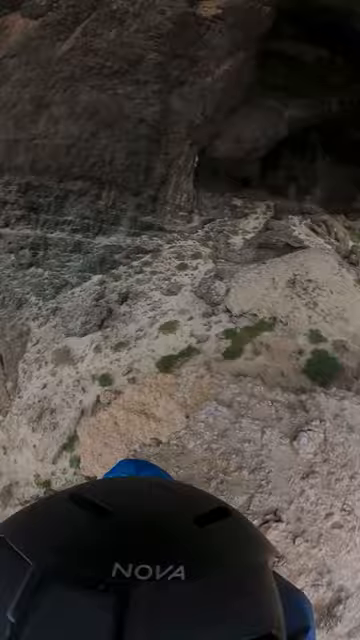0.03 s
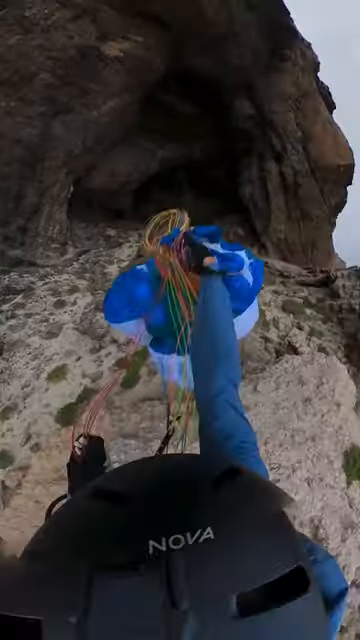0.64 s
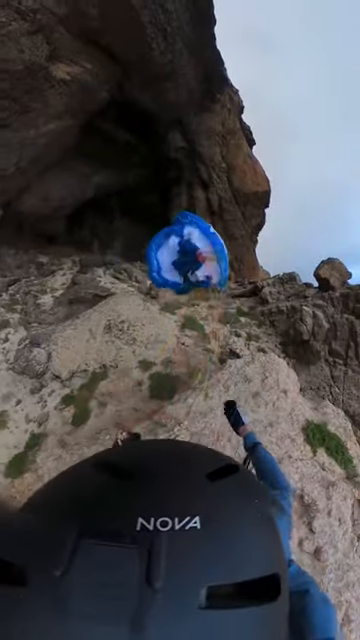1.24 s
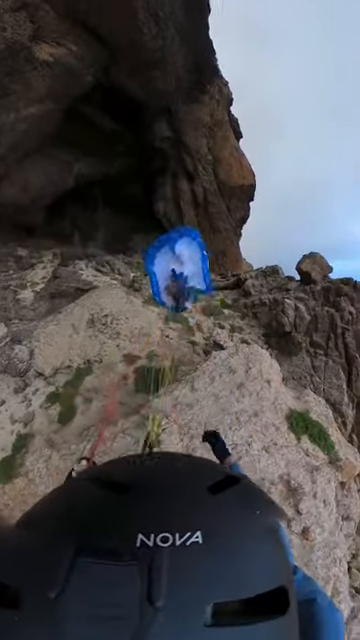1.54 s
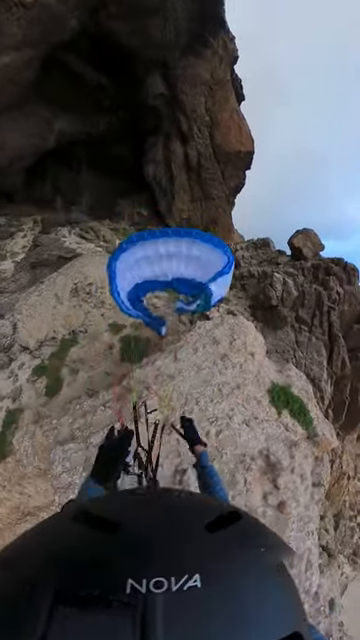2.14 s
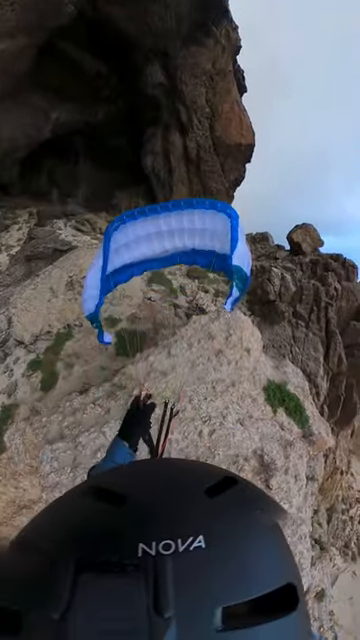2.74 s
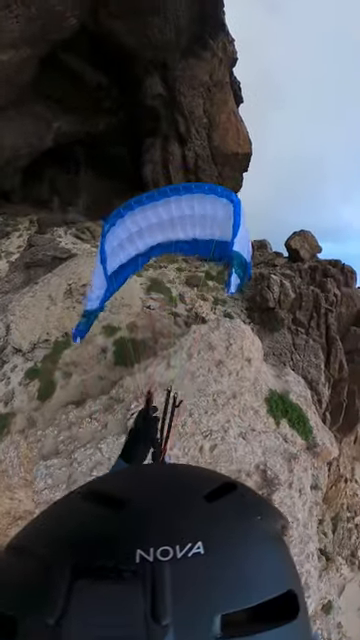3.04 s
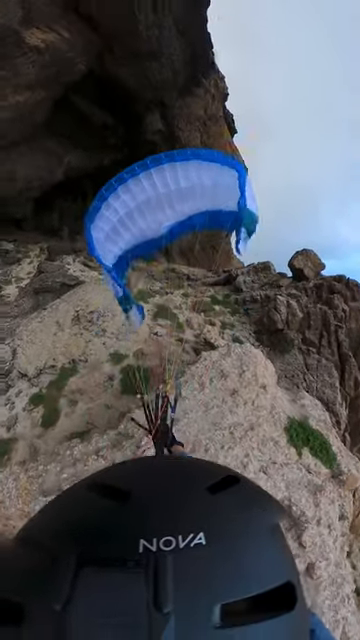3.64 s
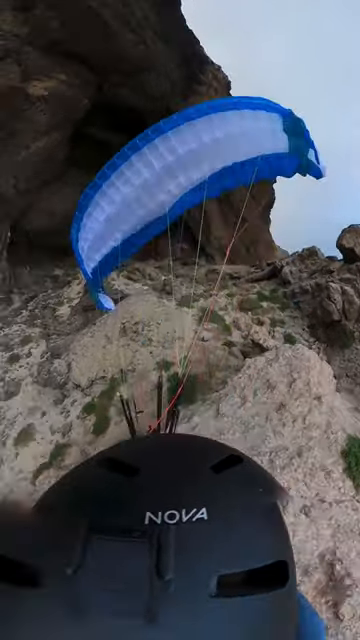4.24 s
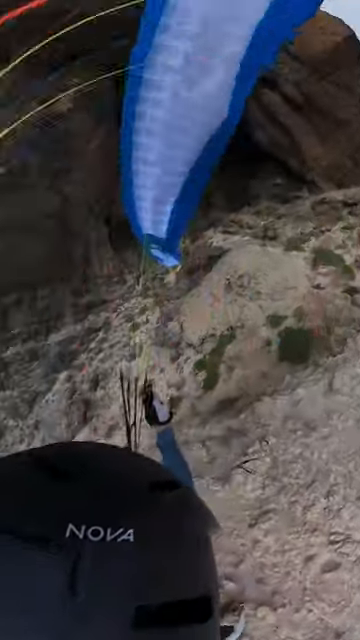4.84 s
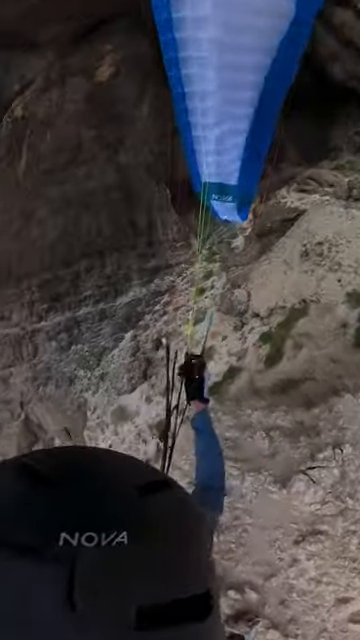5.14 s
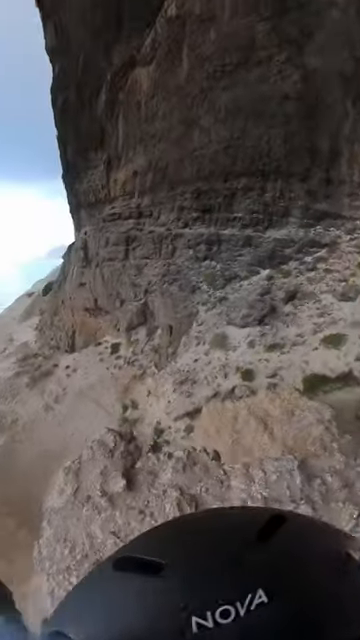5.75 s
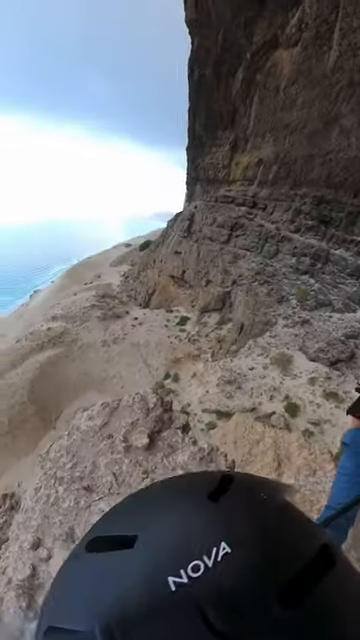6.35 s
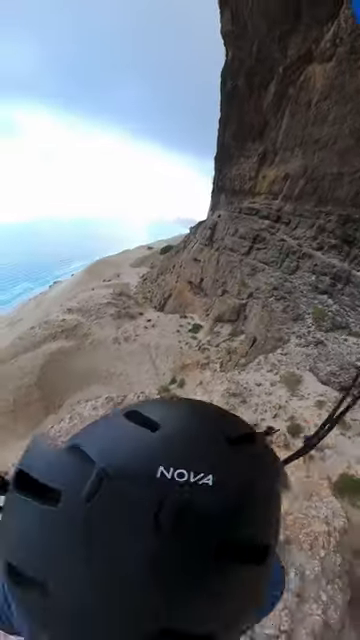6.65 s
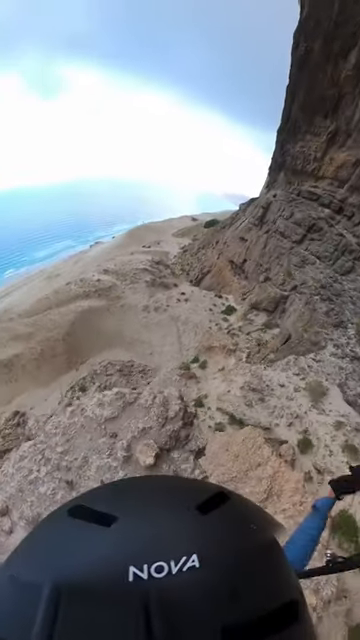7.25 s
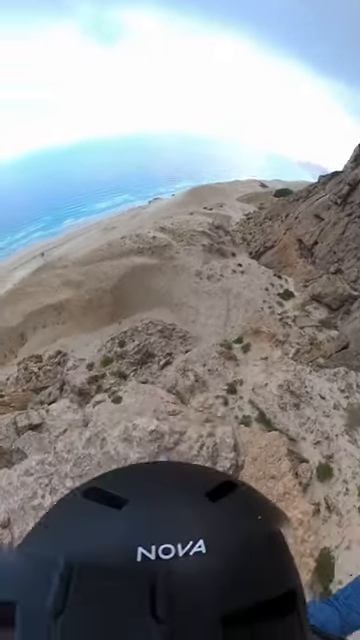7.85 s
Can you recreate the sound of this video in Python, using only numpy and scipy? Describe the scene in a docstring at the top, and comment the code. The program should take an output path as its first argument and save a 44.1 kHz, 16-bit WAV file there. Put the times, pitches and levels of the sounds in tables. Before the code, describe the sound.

Wind rushes and thumps on the microphone, swelling to a hiss, with rustling paraglider fabric and small dull knocks from the lines.

```python
"""Beside a cliff, a paraglider pilot throws the wing open and swings away under it.
We ride just above the helmet: the air roars and hisses with speed, and eddies buffet the microphone,
throbbing and hooting across its port. Sleeves brush the harness, the throw whooshes past, and lines
zip over cloth and snap taut with small dull knocks. Nylon swishes and crackles as it pays out and fills."""
import sys
import numpy as np
from scipy import signal
from scipy.fft import rfft, irfft
from scipy.io import wavfile
from scipy.ndimage import uniform_filter1d

SR = 44100
rng = np.random.default_rng(int(sys.argv[2]) if len(sys.argv) > 2 else 0)


def transcribe(signal):
    """Save signal, clipped to [-1, 1], as a 16-bit WAV file at the path in sys.argv[1]."""
    frames = np.atleast_2d(signal).T
    limited = np.clip(frames, -1, 1)
    pcm = np.round(limited * 32767).astype(np.int16)
    wavfile.write(sys.argv[1], SR, pcm)


N = 357210
TIME = np.arange(N) / SR

# The tone colours of the noise layers. Each row: frequency in Hz, relative level in dB.
ROAR_SPECTRUM = [(100, -20.5), (220, 3), (380, 1), (650, -2), (1000, -7.5), (1600, -13), (2500, -21),
                 (4500, -29.5), (9000, -68), (14000, -89)]
HISS_SPECTRUM = [(400, -25.5), (1200, 2.5), (2600, 4), (4000, 0.5), (5600, -1.5), (6500, -5), (8000, -9.5),
                 (9700, -17), (10500, -22.5), (12500, -29), (15500, -55)]
FIZZ_SPECTRUM = [(6000, -29), (9500, 4), (10500, -15), (11500, -1), (12300, 3), (13500, -2), (15500, -7.5)]
BUFFET_SPECTRUM = [(8, -9), (20, 4.5), (30, -0.5), (52, -0.5), (80, -6.5), (120, -10.5), (200, -33),
                   (400, -46), (900, -104)]
FLUTTER_SPECTRUM = [(50, -22.5), (100, -3.5), (135, 1.5), (200, 2), (300, -8.5), (450, -24), (800, -49.5),
                    (2000, -87)]
SLEEVE_SPECTRUM = [(500, -14), (1300, 7), (2600, 4.5), (5300, -1), (7000, -7.5), (10000, -17), (14000, -41)]
ZIP_SPECTRUM = [(6000, -15), (9000, -7), (10900, -1), (12000, -9), (13300, -12), (14500, -32)]
NYLON_SPECTRUM = [(150, -15), (400, -3), (800, 11), (1600, 11), (2500, 6.5), (4000, -0.5), (6000, -9.5),
                  (10000, -61)]

# The air stream, growing with speed. Each row: time in seconds, level in dB relative to full speed.
STREAM_LEVEL = [(0.04, -10.5), (1.0, -16), (1.45, -9.5), (2.1, -12.5), (2.6, -5.5), (2.95, -1.5),
                (3.27, -6.5), (3.39, 0.5), (4.25, -1.5), (4.8, -1), (5.0, 1), (5.25, -0.5), (5.45, -6.5),
                (5.8, -16), (6.15, -13.5), (6.42, -13.5), (6.85, -11.5), (7.45, -8.5), (8.1, -12.5)]
# The bed of buffeting between gusts, weakest in mid flight. Each row: time in seconds, level in dB.
BREEZE_LEVEL = [(0.04, -47), (0.42, -37.5), (0.8, -38), (1.5, -33), (2.0, -40), (3.0, -41), (3.9, -41.5),
                (4.5, -48.5), (5.0, -39.5), (5.5, -30), (5.72, -40), (6.05, -37), (6.5, -36.5), (6.8, -38),
                (7.15, -33), (7.65, -34.5), (8.1, -32)]
# Passing gusts. Each row: centre in seconds, buffet in dB, half length in seconds, flutter in dB.
GUSTS = [(0.067, -26.5, 0.063, -35.5), (0.191, -24.5, 0.042, -36), (0.233, -21.5, 0.045, -34.5),
         (0.324, -22.5, 0.022, -33.5), (0.528, -32, 0.047, -41.5), (0.69, -36, 0.094, -42.5),
         (0.93, -33, 0.15, -45.5), (1.19, -32, 0.071, -43.5), (1.363, -30, 0.033, -50),
         (1.53, -35, 0.032, -56), (1.674, -51, 0.036, -38.5), (2.33, -31, 0.092, -47.5),
         (2.598, -33.5, 0.062, -43.5), (3.125, -32, 0.11, -41.5), (3.39, -40, 0.12, -45.5),
         (3.75, -46, 0.034, -42), (3.965, -37, 0.027, -36.5), (4.746, -43, 0.061, -41.5),
         (4.973, -31, 0.075, -43), (5.08, -25.5, 0.052, -33), (5.142, -25, 0.029, -28.5),
         (5.19, -31, 0.022, -25.5), (5.256, -23, 0.077, -28), (5.412, -29, 0.043, -37.5),
         (5.609, -47, 0.033, -40), (5.814, -33, 0.014, -60), (6.274, -28, 0.064, -57),
         (6.397, -33.5, 0.14, -65), (6.958, -32.5, 0.047, -58), (7.44, -31.5, 0.05, -54),
         (7.54, -29, 0.067, -46), (7.8, -31, 0.034, -45), (7.904, -33, 0.03, -56), (7.973, -31, 0.031, -59)]
# Single throbbing eddies. Each row: centre in seconds, level in dB, half length in seconds, pitch in Hz.
PUFFS = [(0.081, -21, 0.015, 90.7), (0.095, -27.5, 0.023, 190.2), (0.227, -19.5, 0.011, 63.9),
         (0.872, -43, .018, 119.5), (1.032, -30.5, 0.011, 116), (1.11, -36.5, 0.013, 129.8),
         (1.141, -25, 0.011, 62), (1.205, -28, 0.017, 88), (1.236, -25, 0.011, 52),
         (3.366, -38, 0.064, 136.6), (5.084, -34, 0.018, 113.7), (5.157, -31.5, .018, 170),
         (5.192, -24, 0.0091, 150.6), (5.236, -19, 0.021, 46), (5.269, -21.5, 0.013, 71.6),
         (5.413, -28.5, 0.014, 87.8), (5.81, -31.5, 0.0061, 65), (6.243, -31, 0.013, 45.3),
         (6.281, -26, 0.012, 81.8), (6.391, -30.5, 0.012, 58.6), (6.935, -29, 0.02, 109.3),
         (7.395, -28.5, .011, 64.6), (7.427, -32.5, 0.011, 130), (7.579, -24.5, 0.016, 40),
         (7.617, -23, 0.011, 47.9), (7.76, -26, 0.013, 58), (7.906, -27.5, 0.012, 92.3),
         (8.018, -29, .012, 70)]
# Vortices shed at the microphone port by the strongest gusts.
# Each row: start in seconds, level in dB, hold in seconds, starting pitch in Hz.
VORTICES = [(0.238, -39, 0.0031, 430), (0.251, -31, 0.0042, 268), (5.061, -31.5, 0.0062, 290),
            (5.171, -30, 0.0058, 255.6), (5.179, -27, 0.0074, 386), (5.231, -33.5, .003, 339),
            (5.268, -38, 0.0052, 367), (5.291, -31, .003, 289.2), (5.298, -29, 0.009, 385),
            (5.325, -34, .003, 400), (5.333, -38.5, .006, 501), (5.349, -49, 0.009, 850)]
# Sleeves on the harness. Each row: centre in seconds, level in dB, half length in seconds.
BRUSHES = [(0.5, -53, 0.0091), (0.65, -55, 0.048), (1.745, -50, 0.0073), (1.94, -53, .012),
           (1.973, -49, 0.0053), (2.06, -56, 0.03), (2.695, -52, 0.057), (2.85, -52.5, 0.08),
           (2.97, -55, 0.019), (3.46, -56, 0.055), (3.62, -52.5, 0.031), (3.715, -54, 0.035),
           (4.03, -55, 0.14), (4.375, -51.5, 0.038), (4.565, -53, 0.067), (4.99, -54.5, 0.1),
           (5.53, -58.5, 0.06), (5.64, -54, 0.053), (5.78, -55.5, 0.14), (6.05, -62, 0.13),
           (6.61, -57, 0.076), (6.685, -59, 0.031), (6.81, -56.5, 0.14), (7.14, -62, 0.064),
           (7.45, -63, 0.073), (7.92, -57, 0.064), (8.06, -57.5, 0.078)]
# Lines running over fabric. Each row: centre in seconds, level in dB, half length in seconds.
ZIPS = [(5.08, -70, .015), (5.168, -69, 0.02), (5.533, -77, .012), (5.566, -64, 0.004), (5.572, -69, 0.045)]
# Tugs of the rigging. Each row: centre in seconds, level in dB, pitch in Hz, half length in milliseconds.
KNOCKS = [(0.1939, -21, 500, 1.46), (0.372, -34, 950, 0.92), (0.3925, -24, 700, 0.7),
          (0.447, -31, 1400, 1.1), (2.8598, -24.5, 990, 0.86), (3.475, -28.5, 460, 1.4),
          (3.9545, -29, 597, 2.3), (3.9582, -33, 1800, 0.52), (3.9638, -18, 580, 1.35),
          (3.9654, -21.5, 364, 2.4), (3.9700, -31, 580, 2.3), (4.0460, -26.5, 750, 0.59),
          (5.417, -27, 400, 1.8), (5.4399, -20.5, 1060, 0.7), (5.4825, -24.5, 770, 0.85),
          (5.5154, -21, 1000, 0.47), (5.6222, -29.5, 950, 0.62), (5.7262, -22.5, 880, 1.2),
          (7.957, -24, 800, 0.22)]
# The ring of the microphone mount. Each row: pitch in Hz, gain in dB, time to fall 60 dB in seconds.
MOUNT_MODES = [(414, -11.5, 0.022), (784, 15, 0.0023), (1340, -18.5, 0.026)]
# Strokes of sliding nylon. Each row: start, end, rise and fall in seconds, swish in dB, hiss in dB.
SWISHES = [(0.347, 0.472, 0.06, 0.38, -51, -61), (0.558, 0.655, 0.089, 0.14, -47, -52),
           (1.584, 1.88, 0.037, 0.068, -48, -54), (1.933, 1.948, 0.053, 0.2, -44.5, -50),
           (2.2, 2.407, 0.2, 0.16, -55.5, -56.5)]
# The rustle sharpens as the cloth slides faster. Each row: time in seconds, band centre in Hz.
WEAVE_PITCH = [(0.35, 2000), (0.65, 4236), (1.58, 2600), (1.95, 4010), (2.4, 3190)]


def amp(db):
    return 10 ** (np.asarray(db) / 20)


def unit(x):
    return x / np.sqrt(np.mean(x ** 2) + 1e-20)


def curve(rows):
    """Straight ramps between rows of time and value."""
    return np.interp(TIME, *np.transpose(rows))


def stroke(start, end, rise_s, fall_s):
    """An envelope that grows until the start, holds, and dies away after the end."""
    return np.exp(np.minimum(TIME - start, 0) / rise_s - np.maximum(TIME - end, 0) / fall_s)


def swells(rows, power=1):
    """An envelope with one bell-shaped swell a row; with power=2 overlaps add as noises do."""
    total = np.zeros(N)
    for centre, db, half_s in rows:
        near = slice(*np.searchsorted(TIME, [centre - 4 * half_s, centre + 4 * half_s]))
        total[near] += (amp(db) * np.exp(-((TIME[near] - centre) / half_s) ** 2)) ** power
    return total ** (1 / power)


def together(*levels):
    """The level of several noises at once: their powers add."""
    return np.sqrt(sum(level ** 2 for level in levels))


def colour(x, spectrum):
    """Equalises x with the spectrum, at rms 1."""
    hz, db = np.transpose(spectrum)
    freqs = np.fft.rfftfreq(N, 1 / SR)
    gain = amp(np.interp(np.log(freqs + 1), np.log(hz), db))
    return unit(irfft(rfft(x) * gain, N))


def wander(rate_hz):
    """A smooth random drift, rms about 1, rolled off above the rate."""
    size = N // 20
    freqs = np.fft.rfftfreq(size, TIME[-1] / size)
    drift = unit(irfft(rfft(rng.standard_normal(size)) / (1 + (freqs / rate_hz) ** 4), size))
    return np.interp(TIME, np.linspace(0, TIME[-1], size), drift)


def turbulence(spectrum, churn_db, churn_hz):
    """Coloured noise that comes in lumps."""
    return colour(rng.standard_normal(N) * amp(churn_db * wander(churn_hz)), spectrum)


def levelled(x, span_s):
    """Evens out the slow swells of a noise and keeps its single eddies."""
    size = int(span_s * SR)
    power = uniform_filter1d(uniform_filter1d(x ** 2, size), size)
    return x / np.sqrt(power + 1e-6)


def lowpass(x, hz, order):
    return signal.sosfilt(signal.butter(order, hz, fs=SR, output="sos"), x)


def gusts():
    """Two envelopes: how hard the passing gusts push and how hard they flutter."""
    push = swells([(s, db, half_s) for s, db, half_s, _ in GUSTS], power=2)
    flutter = swells([(s, db, half_s) for s, _, half_s, db in GUSTS], power=2)
    return push, flutter


def airstream(roar_slope=0.31, hiss_slope=1.1, fizz_slope=4.8, fizz_full_db=-1, fizz_swell_s=0.22):
    """Air tears past helmet and lines: a lumpy roar, a smoother hiss, and fizz at top speed."""
    stream_db = curve(STREAM_LEVEL)  # each voice gains its slope in dB for one dB of stream
    _, gust_flutter = gusts()
    rush = turbulence(ROAR_SPECTRUM, churn_db=1.0, churn_hz=41.4)
    dull_rush = lowpass(turbulence(ROAR_SPECTRUM, churn_db=-1.5, churn_hz=45), hz=740, order=2)
    roar = amp(-43.5 + roar_slope * stream_db) * rush + amp(-16) * gust_flutter * dull_rush
    hiss = amp(-53.5 + hiss_slope * stream_db) * turbulence(HISS_SPECTRUM, churn_db=0.8, churn_hz=59)
    sustained_db = uniform_filter1d(stream_db, int(fizz_swell_s * SR))
    fizz_level = amp(-74.5 + fizz_slope * np.minimum(sustained_db - fizz_full_db, 0))
    fizz = fizz_level * turbulence(FIZZ_SPECTRUM, churn_db=-0.5, churn_hz=60)
    return roar + hiss + fizz


def buffeting(calm_hz=190, bright_db=-35, flutter_slope=0.26):
    """Large eddies push on the diaphragm; small ones ride their peaks and brighten as the gust grows."""
    gust_push, gust_flutter = gusts()
    push = together(gust_push, amp(curve(BREEZE_LEVEL)))
    flutter = together(gust_flutter, amp(-45.5 + flutter_slope * curve(STREAM_LEVEL)))
    large = levelled(turbulence(BUFFET_SPECTRUM, churn_db=1.0, churn_hz=26.2), span_s=0.033)
    small = turbulence(FLUTTER_SPECTRUM, churn_db=1.5, churn_hz=50.3) * (1 + 0.13 * abs(large))
    soft = lowpass(small, calm_hz, order=1)
    brightness = np.clip(flutter / amp(bright_db), 0, 1)
    small = levelled(soft + brightness * (small - soft), span_s=0.078)
    return push * large + flutter * small


def puffs(waver=0.24, waver_hz=45):
    """Low throbs: each passing eddy pushes a few uneven times on the diaphragm."""
    out = np.zeros(N)
    for centre, db, half_s, hz in PUFFS:
        cycles = np.cumsum(hz * (1 + waver * wander(waver_hz))) / SR
        out += swells([(centre, db, half_s)]) * np.sqrt(2) * np.sin(2 * np.pi * cycles)
    return out


def vortices(waver=0.1446, waver_hz=130, rough_db=2, tear_db=-15, tear_hz=300, octaves_per_s=5.1):
    """Rough hoots that rise as air cuts faster across the port, tearing into a faint ragged octave."""
    out = np.zeros(N)
    wobble = 1 + waver * wander(waver_hz)
    roughness = amp(rough_db * wander(waver_hz))
    tear = amp(tear_db) * wander(tear_hz)
    for start, db, hold_s, hz in VORTICES:
        octaves = np.clip(octaves_per_s * (TIME - start), -1, 1)
        phase = 2 * np.pi * np.cumsum(hz * wobble * 2 ** octaves) / SR
        hoot = np.sqrt(2) * (np.sin(phase) + tear * np.sin(2 * phase))
        out += amp(db) * stroke(start, start + hold_s, rise_s=0.0011, fall_s=0.003) * hoot
    return roughness * out


def sleeves():
    """Short grainy brushes of jacket against harness."""
    return swells(BRUSHES) * turbulence(SLEEVE_SPECTRUM, churn_db=1.0, churn_hz=160)


def throw():
    """A low whoosh of air pushed aside as the arm swings the packed wing out."""
    level = amp(-42) * stroke(start=0.42, end=0.5, rise_s=0.4, fall_s=0.14)
    return level * turbulence(ROAR_SPECTRUM, churn_db=0.0, churn_hz=44)


def zips():
    """Thin lines run briefly over cloth, catching as they go."""
    return swells(ZIPS) * turbulence(ZIP_SPECTRUM, churn_db=4.5, churn_hz=250)


def rigging(ring_rise_s=0.0015):
    """Lines and risers snap taut: each tug is a quick push and rebound that sets the mount ringing."""
    out = np.zeros(N)
    lead = SR // 50  # room for the push to build before its centre
    t = np.arange(-lead, 2 * lead) / SR
    after = np.maximum(t, 0)
    ring = sum(amp(db - 60 * after / t60) * np.sin(2 * np.pi * hz * after) for hz, db, t60 in MOUNT_MODES)
    ring *= 1 - np.exp(-after / ring_rise_s)
    for centre, db, hz, half_ms in KNOCKS:
        tug = np.exp(-(1000 * t / half_ms) ** 2) * np.cos(2 * np.pi * hz * t)
        first = round(centre * SR) - lead
        out[first:first + len(t)] += amp(db) * (tug + ring)
    return out


def nylon(creases_per_s=700, crease_db=-4, spread_db=3.5, clump_db=3, weave_db=-9, weave_width_hz=1700):
    """Cloth slides on cloth: a hissing swish, clumps of tiny crease snaps, a gliding band of weave."""
    snap_db = spread_db * np.minimum(rng.exponential(1, N), 3) + clump_db * wander(rate_hz=25)
    snaps = amp(snap_db) * rng.choice([-1, 1], N)
    creases = colour(snaps * (rng.random(N) < creases_per_s / SR), NYLON_SPECTRUM)
    slide = turbulence(NYLON_SPECTRUM, churn_db=0.5, churn_hz=40)
    hiss = turbulence(HISS_SPECTRUM, churn_db=0.3, churn_hz=60)
    carrier = np.exp(2j * np.pi * np.cumsum(curve(WEAVE_PITCH)) / SR)
    smear = wander(weave_width_hz) + 1j * wander(weave_width_hz)  # spreads the pitch into a broad band
    weave = unit((carrier * smear).real)
    swish_level = together(*(amp(db) * stroke(*shape) for *shape, db, _ in SWISHES))
    hiss_level = together(*(amp(db) * stroke(*shape) for *shape, _, db in SWISHES))
    return swish_level * (slide + amp(crease_db) * creases + amp(weave_db) * weave) + hiss_level * hiss


def scene():
    """The wind and the gear, mixed in mono."""
    wind = buffeting() + puffs() + vortices() + airstream()
    gear = throw() + nylon() + sleeves() + rigging() + zips()
    return (wind + gear)[None]


def record(dry):
    """The sound starts after a brief silence with a quick fade in, and the very top of the treble is cut away."""
    open_s, fade_s, cutoff_hz = 0.036, 0.004, 15700
    opened = dry * np.clip((TIME - open_s) / fade_s, 0, 1)
    high_cut = signal.firwin(511, cutoff_hz, window=("kaiser", 9), fs=SR)
    return signal.oaconvolve(opened, high_cut[None], "same")


dry = scene()
out = record(dry)
transcribe(out)
```